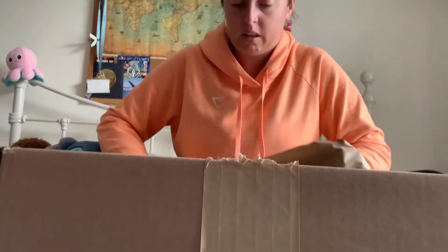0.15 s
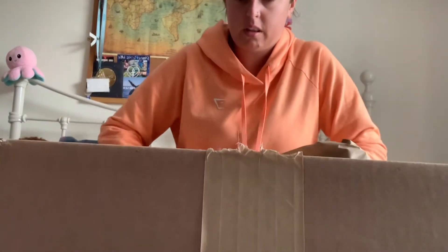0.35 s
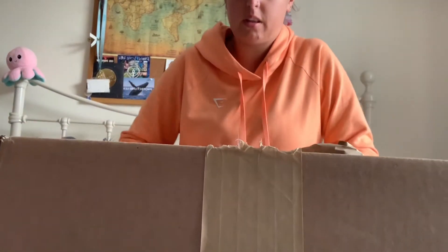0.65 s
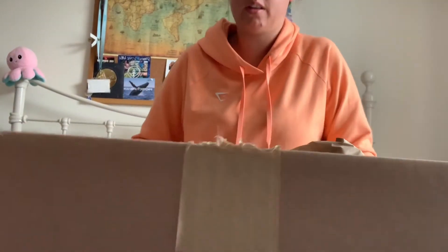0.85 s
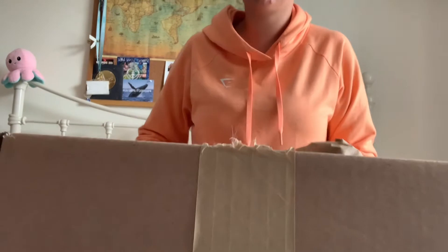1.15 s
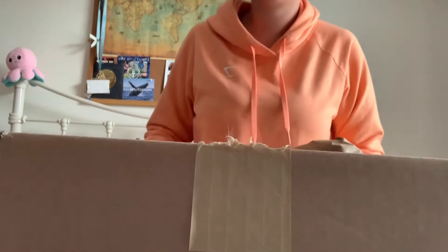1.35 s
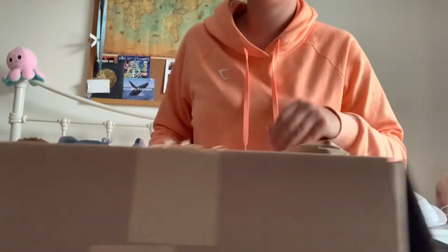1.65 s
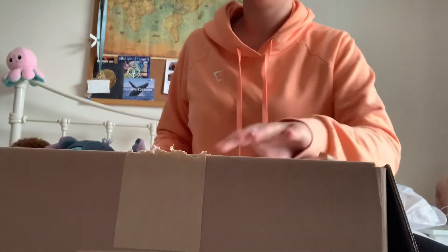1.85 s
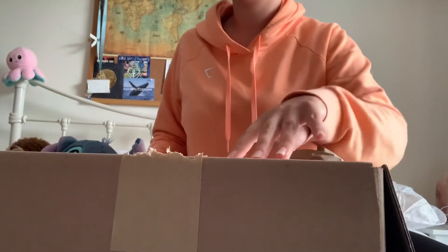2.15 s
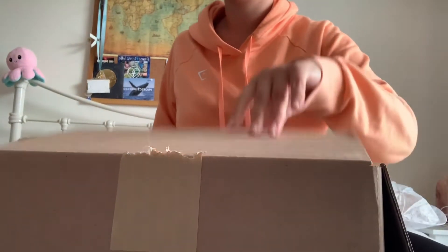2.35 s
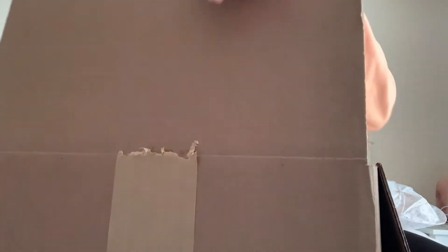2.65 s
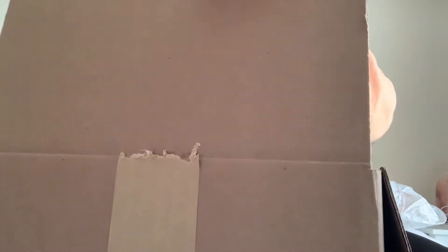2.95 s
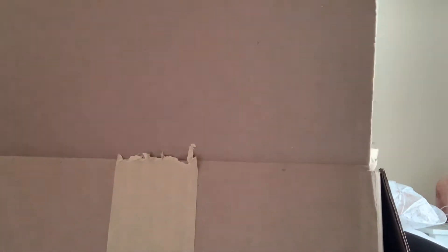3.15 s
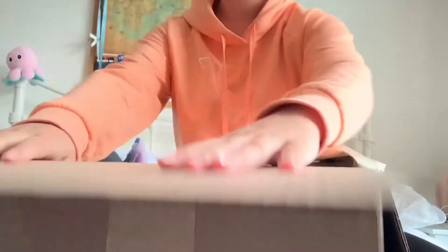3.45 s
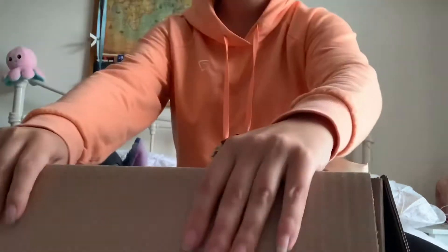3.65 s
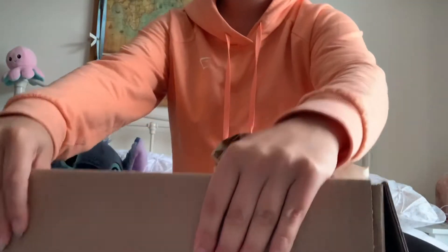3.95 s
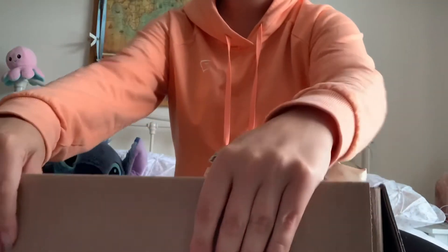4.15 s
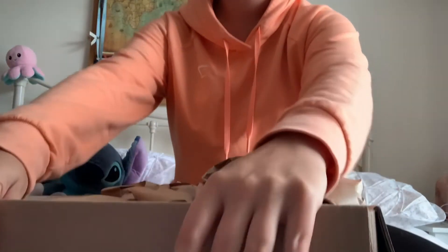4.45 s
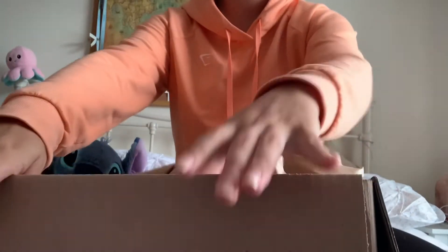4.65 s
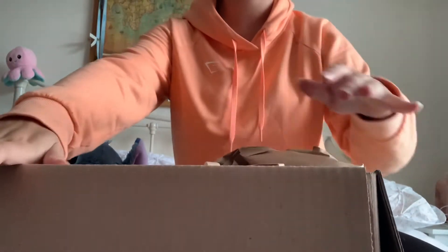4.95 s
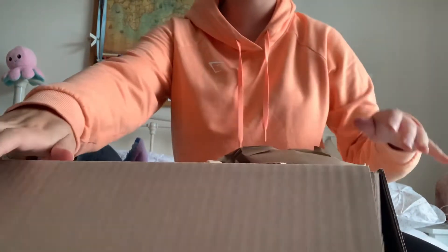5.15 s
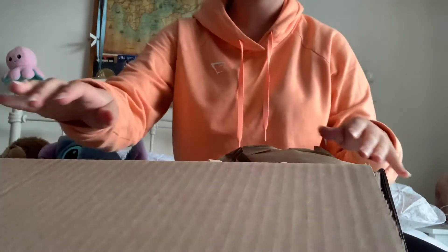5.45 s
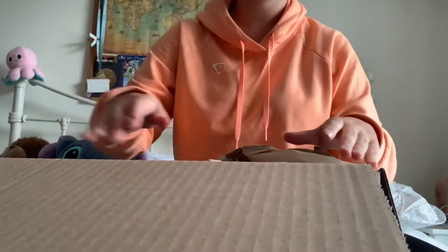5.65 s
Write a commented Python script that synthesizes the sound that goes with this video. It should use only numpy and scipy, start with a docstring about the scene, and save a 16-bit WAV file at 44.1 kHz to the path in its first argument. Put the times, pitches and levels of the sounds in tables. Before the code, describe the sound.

Close-up unboxing: paper crumples and rustles, box walls drum and knock, a cardboard flap groans with a hiss, then light taps and near silence.

```python
"""In a bedroom, hands rummage in kraft paper inside a cardboard box, close to a small stereo microphone.
Paper crinkles and snaps as clumps of tiny cracks; sliding sheets hiss as noise that swells and dies away.
A lifted flap groans and grinds, stiff paper scrapes, and blows ring the resonances of the hollow box.
The handling stops for half a second, then the paper stirs again over a low rumble and faint ticking."""
import sys
import numpy as np
from scipy import signal
from scipy.fft import rfft, irfft
from scipy.io import wavfile
from scipy.ndimage import uniform_filter1d

SR = 44100
rng = np.random.default_rng(int(sys.argv[2]) if len(sys.argv) > 2 else 0)


def wav_out(sig):
    """Save sig, one row per channel (or a flat mono array), as 16-bit PCM at SR to the path in sys.argv[1]."""
    wavfile.write(sys.argv[1], SR, np.round(np.clip(np.atleast_2d(sig).T, -1, 1) * 32767).astype(np.int16))


N = 256220
TIME, HZ = np.arange(N) / SR, np.fft.rfftfreq(N, 1 / SR)
RELEASE_S = 0.034  # how quickly a hand lets go

# All levels in the tables are relative; the functions add their own trims.
# a hand shoves the paper against the box: (start t/s, length/s, crinkling/dB, wall drumming/dB, dry rasp/dB)
HAND_SHOVES = [(0, 0.11, -51.5, -50.5, -60), (.12, 0.14, -55, -50, -49), (.29, 0.31, -70.5, -42, -61),
               (.505, 0.31, -52, -46, -47), (.82, 0.16, -58, -42.5, -47.5), (1.055, 0.097, -52, -43, -46.5),
               (1.215, 0.13, -51, -43, -52), (1.39, 0.091, -61.5, -47, -54),
               (1.46, 0.23, -59, -45.5, -51.5), (1.775, 0.0086, -58.5, -51, -55),
               (1.812, 0.15, -50.5, -54.5, -56), (2, 0.065, -52.5, -48, -49.5), (2.1, 0.19, -66, -57, -60),
               (2.295, 0.084, -50, -44, -50.5), (2.425, 0.27, -49.5, -45, -48.5),
               (2.72, 0.346, -55, -49, -55), (3.14, 0.65, -60, -43, -45.5), (3.49, 0.095, -48.5, -46, -47),
               (3.67, 0.13, -65, -45.5, -54.5), (3.83, 0.14, -64.5, -53.5, -60),
               (3.972, 0.045, -56, -80, -51), (4.04, 0.15, -62, -54, -56.5), (4.25, 0.29, -68, -51, -56.5),
               (4.55, 0.18, -67, -51, -54), (5.728, 0.094, -62.5, -81, -86)]
# colour of paper sliding on paper, and of cracking fibres: (f/Hz, level/dB)
SLIDE_COLOUR = [(4000, -7.5), (6500, 0.5), (8600, 1), (11800, 0.5), (13000, -9), (14500, -12), (16000, -74)]


def amp(db):
    """Turns decibels into a gain."""
    return 10 ** (np.asarray(db) / 20)


def evened(x):
    """Scales a sound to an rms of 1."""
    return x / np.sqrt(np.mean(x ** 2) + 1e-20)


def read(points, hz):
    """Reads a table between its points, on a log-frequency axis."""
    f, value = np.transpose(points)
    return np.interp(np.log(hz + 1), np.log(f + 1), value)


def add(mix, s, sound):
    """Mixes a sound in at time s."""
    part = mix[..., max(round(s * SR), 0):][..., :sound.shape[-1]]
    part += sound[..., :part.shape[-1]]


def blend(pair):
    """Makes two unrelated channels as alike as scattered sound is at the two microphone ports."""
    # likeness of the two ports: (f/Hz, likeness 0-1)
    likeness = [(50, .8), (200, .65), (500, .5), (1200, .75), (2500, .4), (6500, .3), (8400, .99),
                (9700, .99), (11000, .8), (13000, .99)]
    a, b = rfft(pair)
    same = np.clip(read(likeness, HZ), 0, 1)
    return irfft(np.array([a, same * a + np.sqrt(1 - same ** 2) * b]), N)


def noise(colour, patchy_db=0, size=256):
    """Coloured stereo noise of rms 1; resonances come and go in patches as the surface bends."""
    hz, _, z = signal.stft(rng.standard_normal((2, N)), SR, nperseg=size)
    patches = rng.standard_normal(z.shape[1:])
    for axis in (0, 1):
        patches = uniform_filter1d(patches, size=5, axis=axis)
    patchy = signal.istft(z * amp(patchy_db * evened(patches)), nperseg=size)[1][:, :N]
    coloured = irfft(rfft(patchy) * amp(read(colour, HZ)), N)
    return evened(blend(coloured))


def slips(per_s, spread_db, length, steady):
    """Envelope of many uneven small slips, each a sudden start and quick decay, over steady friction."""
    strength = amp(spread_db * np.minimum(rng.exponential(1, N), 4))
    size = strength * (rng.random(N) < per_s / SR)
    power = signal.lfilter([1], [1, -np.exp(-2 / (length * SR))], size ** 2)
    # the hand's work is shared among the slips
    power /= uniform_filter1d(power, size=6000) + power.mean() / 10
    return evened(np.sqrt(abs(power) + steady))


def pushes(rows):
    """Gain curve for each dB column: a light brush, a quick grab, a sagging hold and a release."""
    brush_s, brush_db = 0.013, -5  # the hand brushes the paper just before it takes hold
    grab_s, sag_db_per_s = 0.013, -23
    power = 0
    for s, length, *db in rows:
        t = TIME - s
        brush = amp(brush_db) * np.exp(np.minimum(t, 0) / brush_s)
        hold = np.maximum(brush, np.clip(t / grab_s, 0, 1))
        sag = amp(sag_db_per_s * np.clip(t, 0, length))
        release = np.exp(-np.maximum(t - length, 0) / RELEASE_S)
        power = power + (amp(db)[:, None] * hold * sag * release) ** 2
    return np.sqrt(power)


def swells(rows, roundness=1.66):
    """Gain curve of movements that speed up to a peak and slow down again."""
    total = 0
    for s, rise, fall, db in rows:
        side = np.where(TIME < s, rise, fall)
        total = total + amp(db) * np.exp(-abs((TIME - s) / side) ** roundness)
    return total


def bursts(rows, rise_s=.002, fade_s=.024):
    """Gain curve of folds that give way at once and settle."""
    total = 0
    for s, db in rows:
        t = np.maximum(TIME - s, 0)
        total = total + amp(db) * np.minimum(t / rise_s, 1) * np.exp(-np.minimum(t, 1) / fade_s)
    return total


def resonate(x, hz, width):
    """A steep resonance, width in Hz, that follows the pitch curve hz; its output has rms 1."""
    turn = np.exp(2j * np.pi * np.cumsum(hz) / SR)
    r = np.exp(-np.pi * abs(width) / SR)
    # shift the pitch down to zero, smooth, then shift back up
    smooth = signal.lfilter([(1 - r) ** 2], [1, -2 * r, r * r], x / turn)
    return evened((turn * smooth).real)


def background(quiet_db=-66, tick_db=-76, tick_hz=1500, ticks_per_s=18):
    """Low rumble and hiss of the quiet room, with a faint ticking whose pace wanders."""
    # colour of the quiet room: (f/Hz, level/dB)
    quiet_colour = [(20, -8), (45, -1.5), (90, -5.5), (150, -17.5), (400, -31), (2500, -40.5), (12000, -43),
                    (16000, -56)]
    pace = np.repeat(rng.uniform(.1, 1.9, N // 2048 + 1), 2048)[:N]
    count = np.floor(np.cumsum(ticks_per_s * pace) / SR)
    tick = signal.windows.hann(260) * np.sin(2 * np.pi * tick_hz * TIME[:260])
    ticking = signal.fftconvolve(np.diff(count, prepend=0), tick)[:N]
    return amp(quiet_db) * noise(quiet_colour) + amp(tick_db) * ticking


def bedroom(x):
    """A short, soft tail of sparse reflections; the treble dies first."""
    # time for the room to fade by 60 dB: (f/Hz, fade/s)
    room_fade = [(100, 0.21), (14000, 0.069)]
    hits = rng.random((2, SR // 2)) < 3000 / SR
    echoes = rng.choice([-1., 1.], (2, SR // 2)) * hits
    echoes[:, :SR // 200] = 0  # nothing returns in the first 5 ms
    hz, t, z = signal.stft(echoes, SR, nperseg=256)
    tail = signal.istft(z * amp(-60 * t / read(room_fade, hz)[:, None]), SR, nperseg=256)[1]
    tail = tail / np.linalg.norm(tail[0])
    return blend(signal.fftconvolve(x[:1], tail, axes=1)[:, :N])


def panels():
    """Large panels bend under the weight of an arm, and flex faintly, less once the box is let go."""
    # an arm leans on the box: (start t/s, length/s, level/dB)
    lean_table = [(1.27, 0.27, -46), (2, 0.29, -47.5), (3.15, 0.07, -32.5), (3.69, 0.045, -46),
                  (4.14, 0.26, -53), (4.64, 0.09, -44)]
    # colour of the bending panels: (f/Hz, level/dB)
    panel_colour = [(25, -17), (38, -1), (50, 3), (62, 0), (80, -13), (200, -42), (600, -80)]
    held_until_s, held_db, resting_db = 5.27, -57.5, -68.5
    faint_db = np.interp(TIME, [held_until_s - RELEASE_S, held_until_s], [held_db, resting_db])
    return np.hypot(pushes(lean_table)[0], amp(faint_db)) * noise(panel_colour)


def cardboard(drum_db=-2.0, rasp_db=-1.0):
    """Sticking and slipping paper drums on the box walls and rasps on their face."""
    # colours of drumming and rasping: (f/Hz, level/dB)
    drum_colour = [(60, -7.5), (115, 0), (155, 1), (195, -5), (260, -1.5), (340, -16), (500, -18.5),
                   (1500, -74)]
    rasp_colour = [(150, -31), (400, 1.5), (700, -1.5), (1000, -1.5), (1300, -12.5), (1600, -9),
                   (2200, -21.5), (5000, -8)]
    _, drumming, rasping = pushes(HAND_SHOVES)
    drum_slips = slips(per_s=78, spread_db=2.0, length=0.028, steady=0.56)
    drum = amp(drum_db) * drumming * drum_slips * noise(drum_colour, patchy_db=5, size=2048)
    rasp_slips = slips(per_s=290, spread_db=3.5, length=0.015, steady=0.17)
    rasp = amp(rasp_db) * rasping * rasp_slips * noise(rasp_colour, patchy_db=3.5, size=1024)
    # soft board swallows the treble
    return signal.sosfilt(signal.butter(2, 2800, fs=SR, output="sos"), drum + rasp)


def blows(rows, level_db, octaves, rise_s, rattle_db, rattle_s, sustain=1):
    """Each blow rings the box modes near its own pitch; loose contents answer with small later bumps."""
    # resonances of the box: (f/Hz, level/dB, time to fade by 60 dB/s, before sustain stretches it)
    box_modes = [(50, -1, 0.2), (147, -2, 0.055), (230.7, -5.5, 0.072), (263, -3.5, 0.028),
                 (417, 2.5, 0.029), (544, -4.5, 0.051), (698, 4, 0.052), (826, 5.5, 0.024),
                 (1069, -17, 0.02), (1310, -7, 0.037), (1560, 2, 0.029)]
    t, out = TIME[:SR // 3], np.zeros(N)
    mode_hz, mode_db, t60 = np.transpose(box_modes)[:, :, None]
    for s, db, hz in rows:
        held_hz = mode_hz * rng.uniform(.93, 1.07, mode_hz.shape)  # the grip of the hands detunes the walls
        reach = 1 / (1 + (np.log2(mode_hz / hz) / octaves) ** 2)
        fade = amp(mode_db - 60 * t / (t60 * sustain))
        modes = reach * fade * np.sin(2 * np.pi * held_hz * (t - rise_s))
        ring = modes.sum(0) * (1 - np.exp(-(t / rise_s) ** 2))
        hits = rng.random(len(t)) < 900 / SR
        bumps = rng.standard_normal(len(t)) * hits * np.exp(-t / rattle_s) * t
        rattle = evened(signal.fftconvolve(ring, bumps)[:len(t)]) * ring.std()
        # the rattle grows half as fast in dB as the blow
        both = amp(db + level_db) * ring + amp(db / 2 + rattle_db) * rattle
        add(out, s, both / abs(ring).max())
    return out


def knocks():
    """Hands and contents knock on the walls and ring the hollow box."""
    # knocks on the box: (t/s, level/dB, pitch of the blow f/Hz)
    knock_table = [(.097, -38.5, 193), (.204, -31.5, 247), (.255, -23.5, 250), (.735, -41, 267),
                   (.78, -41, 277), (.836, -34, 274), (.887, -39, 220), (.944, -46, 192), (1.267, -23, 230),
                   (1.284, -33, 234), (1.346, -32, 343), (1.357, -40.5, 240), (1.5, -40, 162),
                   (1.535, -33.5, 135), (1.826, -31.5, 218), (1.992, -33.5, 132), (2.108, -31, 109),
                   (3.336, -33.5, 68), (3.657, -20.5, 190), (3.7, -34, 129), (3.849, -49, 242),
                   (3.96, -50, 327), (4.317, -38, 176), (4.396, -41, 156), (4.56, -45.5, 217),
                   (4.717, -46, 272), (4.861, -47.5, 267), (5.067, -43, 217), (5.089, -39, 256)]
    return blows(knock_table, level_db=1.5, octaves=0.34, rise_s=0.003584, rattle_db=-24, rattle_s=0.0074)


def taps():
    """Fingertips tap a flap; a free flap rings longer than a held wall."""
    # taps on the flap: (t/s, level/dB, pitch of the blow f/Hz)
    tap_table = [(3.657, -36, 1020), (4.554, -47.5, 890), (4.86, -50, 900), (5.034, -47.5, 710),
                 (5.068, -47, 850), (5.089, -44.5, 694)]
    return blows(tap_table, level_db=0, octaves=0.18, rise_s=0.00056, rattle_db=-38, rattle_s=0.0009,
                 sustain=2.5)


def scrapes(width=0.46, glide_octaves=-0.21, rise_s=0.0009, fade_s=0.0069):
    """Stiff paper catches and judders: slips excite a patch of board whose pitch sinks during each scrape."""
    # scrapes on the cardboard: (start t/s, length/s, level/dB, middle pitch f/Hz)
    scrape_table = [(0.035, 0.024, -56, 527), (0.13, 0.011, -45.5, 375), (0.198, 0.044, -46, 412),
                    (0.251, 0.035, -50, 560), (0.341, 0.014, -52.5, 533), (0.436, 0.044, -49, 550),
                    (0.504, 0.028, -47, 452), (0.892, 0.031, -44.5, 450), (1.213, 0.0089, -46.5, 626),
                    (1.266, 0.015, -38.5, 520), (1.344, 0.0026, -50.5, 1100), (2.38, .005, -51.5, 1630),
                    (2.7, 0.0033, -50.5, 2200), (2.746, 0.0044, -55, 2220), (4.282, 0.012, -55, 580),
                    (4.373, 0.004, -63.5, 940), (4.43, 0.0068, -53, 466), (4.712, 0.11, -62.5, 880),
                    (4.853, 0.01, -54.5, 890), (5.006, 0.011, -64, 870), (5.062, 0.019, -58, 1160)]
    judder = slips(per_s=300, spread_db=2.5, length=.004, steady=.5)
    grit = judder * rng.standard_normal((2, N))
    t, out = TIME[:SR // 8], np.zeros((2, N))
    for s, length, db, hz in scrape_table:
        pitch = hz * 2 ** (glide_octaves * (np.minimum(t / length, 1) - .5))
        shape = np.minimum(t / rise_s, 1) * np.exp(-np.maximum(t - length, 0) / fade_s)
        board = resonate(grit[:, round(s * SR):][:, :len(t)], pitch, width * hz)
        add(out, s, amp(db) * shape * board)
    return blend(out)


def flap(groan_db=-1, waver=0.145, stiffening_per_s=0.54):
    """A crease slips in a wavering groan; each slip grinds in resonances that climb as the fold tightens."""
    # the flap swings on its crease: (t/s, level/dB, pitch before wavering f/Hz)
    swing_table = [(3.06, -66, 238), (3.11, -45, 287), (3.138, -48, 288), (3.15, -36, 281),
                   (3.185, -36.5, 195), (3.24, -26.5, 160), (3.285, -62, 136)]
    # resonances of the grinding crease: (f/Hz when the swing is loudest, width/Hz, level/dB)
    crease_table = [(150, 180, -21.5), (620, 240, -30.5), (1100, 380, -34.5), (1640, 330, -35.5)]
    s, db, hz = np.transpose(swing_table)
    t, out = np.arange(s[0], s[-1], 1 / SR), np.zeros((2, N))
    wobble = evened(uniform_filter1d(rng.standard_normal(N), size=200))[:len(t)]
    pitch = np.interp(t, s, hz) * (1 + waver * wobble)
    groan = evened(np.sin(2 * np.pi * np.cumsum(pitch) / SR))
    tightness = 1 + stiffening_per_s * (t - s[db.argmax()])
    force = amp(np.interp(t, s, db))
    grit = blend(rng.standard_normal((2, N)))[:, :len(t)] * np.exp(groan)
    grind = 0
    for centre, width, level in crease_table:
        grind = grind + amp(level) * resonate(grit, centre * tightness, width)
    add(out, s[0], amp(groan_db) * force * groan + np.sqrt(force) * tightness ** 2 * grind)
    return out


def snaps(rows, colour, crack_s, after_db):
    """A crease gives way: a crack, a short shiver of the sheet, and an echo off a nearby surface."""
    t, power = TIME[:SR // 6], np.zeros(N)
    snap_db, rise_s, echo_s, echo_db, after_s = -2, .0003, .0075, -9, .016
    for s, db in rows:
        crack = amp(db) * np.exp(-t / crack_s) * (1 - np.exp(-t / rise_s))
        shiver = amp(db + after_db) * np.exp(-t / after_s)
        add(power, s, crack ** 2 + shiver ** 2)
        add(power, s + echo_s, (amp(echo_db) * crack) ** 2)
    return amp(snap_db) * np.sqrt(power) * noise(colour, patchy_db=4)


def creases():
    """Paper creases snap through with a sharp crack."""
    # snapping creases: (t/s, level/dB)
    snap_table = [(1.22, -36.5), (1.31, -41), (1.317, -39), (1.465, -41), (1.778, -43), (1.818, -37),
                  (2.006, -33), (2.102, -34), (2.429, -29), (2.475, -25.5), (2.83, -45), (3.981, -35),
                  (3.993, -42), (4.379, -48), (5.733, -45)]
    # colour of a snap: (f/Hz, level/dB)
    snap_colour = [(400, -12), (1400, -1), (4000, -2), (5800, 2), (7000, -1), (11000, -1), (13500, -9),
                   (16000, -20)]
    return snaps(snap_table, snap_colour, crack_s=.0017, after_db=-18)


def fold_fibres():
    """Fibres crack in the fold of the flap, more briefly than a whole crease."""
    # cracking fibres: (t/s, level/dB)
    fibre_table = [(2.592, -34), (3.068, -42), (3.083, -41), (3.092, -38), (3.11, -37), (3.242, -28)]
    return snaps(fibre_table, SLIDE_COLOUR, crack_s=.0008, after_db=-28)


def crackle(sound, count=11):
    """Each crack rings one facet of the crumpled sheet, and so has a colour of its own."""
    facet_hz = 900, 11000  # the largest and the smallest facets
    whole = rfft(sound)
    facet = np.interp(np.log(HZ + 1), np.log(facet_hz), [0, count - 1])
    total = 0
    for k in range(count):
        band = irfft(whole * np.maximum(1 - abs(facet - k), 0), N)
        total = total + band * slips(per_s=100, spread_db=3.4, length=.013, steady=.06)
    return evened(total)


def paper(slide_db=-1, shove_hiss_db=-8, slide_crinkle_db=-18, fizz_db=-44, fizz_growth=1.4):
    """Creases buckle in clumps of tiny cracks; sliding sheets add a fine hiss that brightens with speed."""
    # a sheet slides over another: (fastest at t/s, rise/s, fall/s, level/dB)
    slide_table = [(.22, 0.069, 0.044, -58.5), (.91, 0.07, 0.16, -52.5), (1.83, 0.009, 0.13, -58.5),
                   (2.37, 0.032, 0.034, -52.5), (2.56, 0.084, 0.1, -47.5), (3.28, 0.11, 0.21, -44),
                   (3.72, 0.059, 0.043, -54.5), (4.6, 0.084, 0.093, -60), (4.8, 0.038, 0.086, -68),
                   (5.08, 0.047, 0.028, -58.5), (5.745, 0.015, 0.041, -55)]
    # a fold collapses in a burst of cracks: (t/s, level/dB)
    crumple_table = [(.036, -48.5), (.506, -49), (.544, -51), (.672, -46.5), (1.079, -47), (1.464, -50),
                     (1.877, -57), (2.295, -52.5), (2.388, -46), (2.431, -56), (2.645, -44), (3.52, -46)]
    # colours of the crinkling, and of the top of a fast slide: (f/Hz, level/dB)
    crinkle_colour = [(300, 11.5), (900, 3.5), (1600, 0.5), (3900, -3.5), (5900, 2.5), (6700, -8),
                      (8700, 2), (11000, -10.5), (16000, -98)]
    fizz_colour = [(7000, -39), (10300, -1), (12200, -10), (13800, -12), (16000, -31)]
    shoved, slid = pushes(HAND_SHOVES)[0], swells(slide_table)
    crinkling = np.hypot(shoved, amp(slide_crinkle_db) * slid)
    sliding = np.hypot(slid, amp(shove_hiss_db) * shoved)
    folds = slips(per_s=50, spread_db=1.5, length=.025, steady=.9)
    cracks = slips(per_s=1000, spread_db=2.2, length=.0025, steady=1)
    fibres = slips(per_s=3000, spread_db=3, length=.002, steady=1)
    buckling = np.hypot(crinkling * folds, bursts(crumple_table))
    crinkle = buckling * cracks * crackle(noise(crinkle_colour))
    hiss = amp(slide_db) * sliding * noise(SLIDE_COLOUR, patchy_db=2.5)
    fizz = amp(fizz_db) * (slid / slid.max()) ** fizz_growth * noise(fizz_colour)
    return crinkle + fibres * (hiss + fizz)


def scene(room_db=-12):
    """Paper and box in the room, over its faint background."""
    box = panels() + cardboard() + knocks() + taps()
    near = box + scrapes() + flap() + creases() + fold_fibres() + paper()
    return background() + amp(room_db) * bedroom(near) + near


def record(dry):
    """The two ports hear different level and phase; then come the low cut and the band limit."""
    # how much louder the left port is: (f/Hz, left minus right level/dB)
    tilt = [(65, 5.5), (140, -8), (260, -12.5), (400, -9.5), (700, -4), (6000, 1), (8500, 0)]
    # how far the left port leads: (f/Hz, phase/radians)
    lead = [(40, 0), (150, -1.3), (260, -1.3), (550, .9), (4500, 0), (6500, -1), (7500, -2.7), (9800, -3.2),
            (11300, -4.6), (12500, -2 * np.pi)]
    edge_hz = 15900
    half = amp(read(tilt, HZ) / 2) * np.exp(.5j * read(lead, HZ))  # each port takes half the difference
    ports = np.array([half, 1 / half])
    ports /= np.sqrt(np.mean(abs(ports) ** 2, axis=0))
    low_cut = 1 - 1 / (1 + (HZ / 33) ** 6)
    heard = irfft(rfft(dry) * ports * low_cut, N)
    band_limit = signal.firwin(511, edge_hz, window=("kaiser", 9), fs=SR)
    return signal.oaconvolve(heard, band_limit[None], "same")


dry = scene()
out = record(dry)
wav_out(out)
```